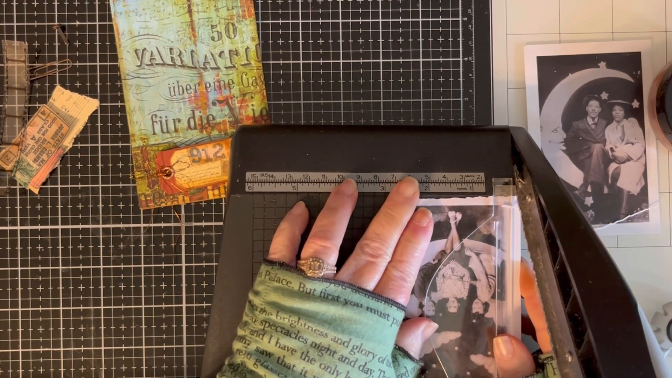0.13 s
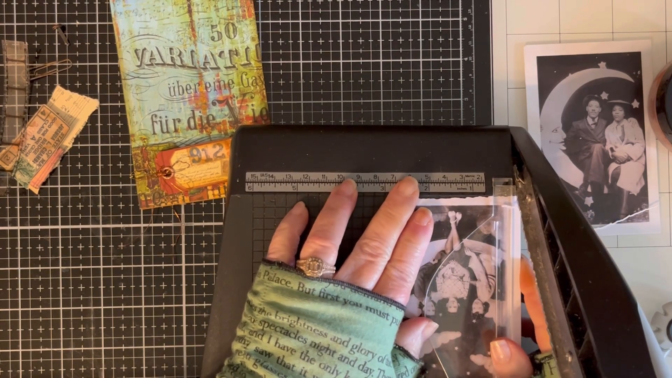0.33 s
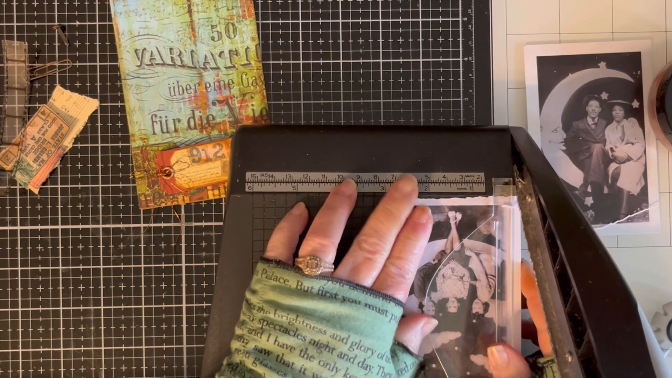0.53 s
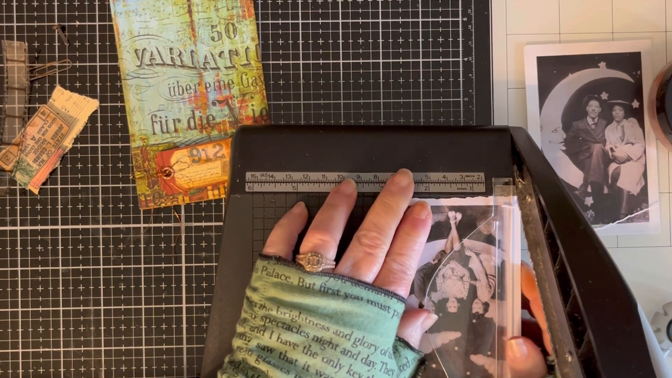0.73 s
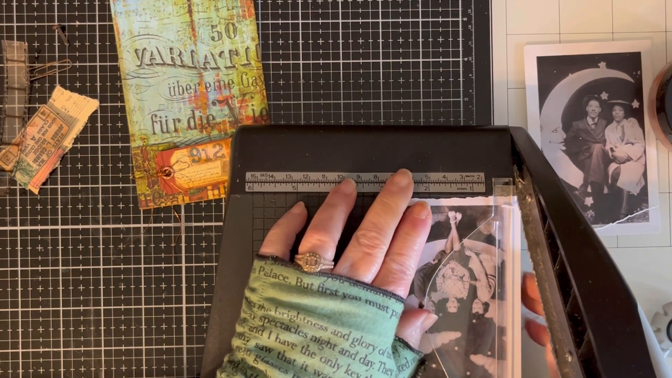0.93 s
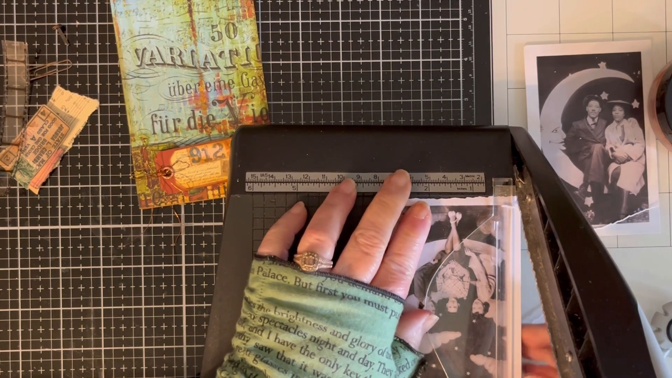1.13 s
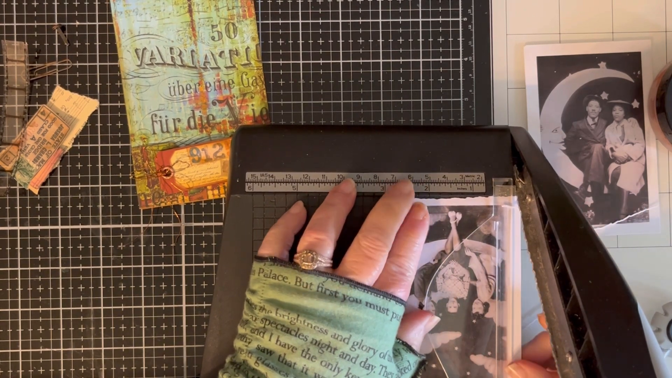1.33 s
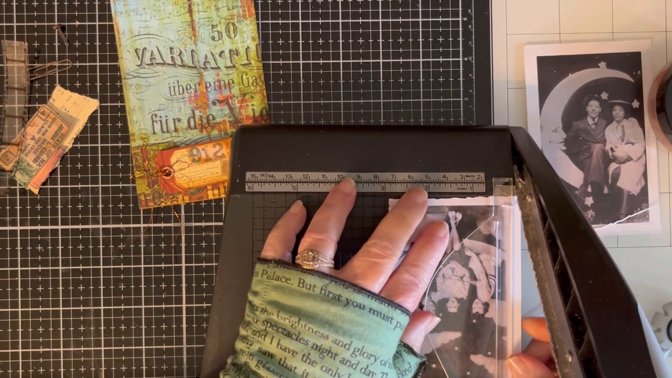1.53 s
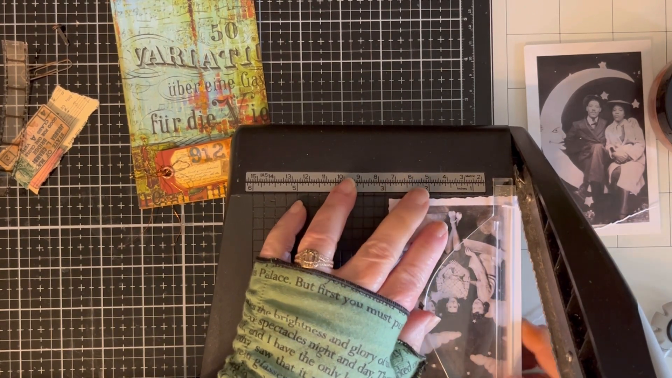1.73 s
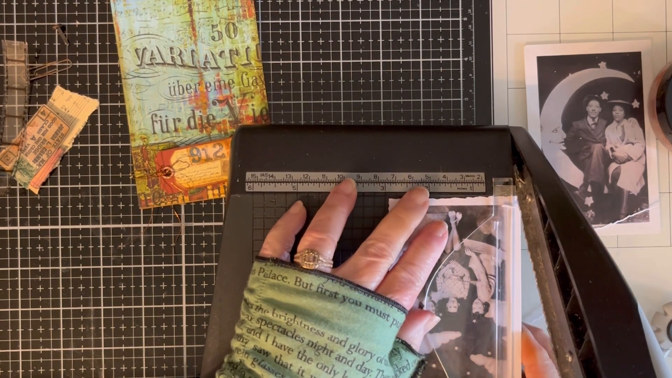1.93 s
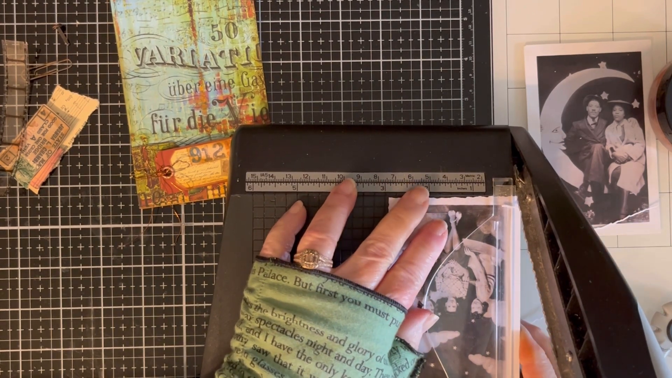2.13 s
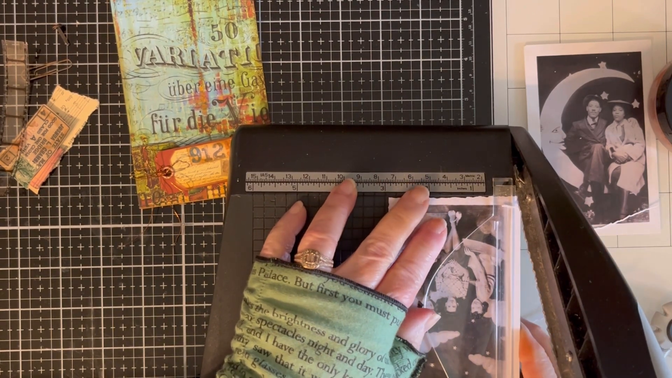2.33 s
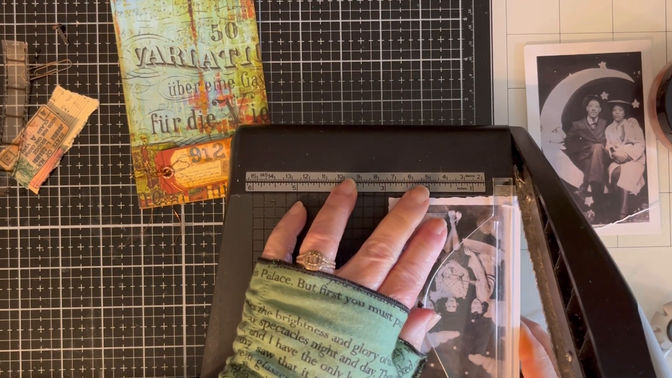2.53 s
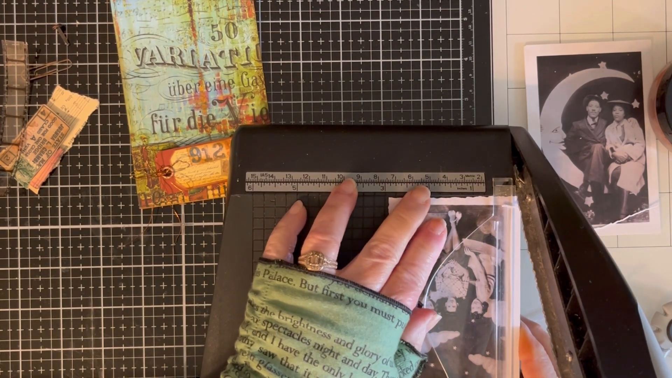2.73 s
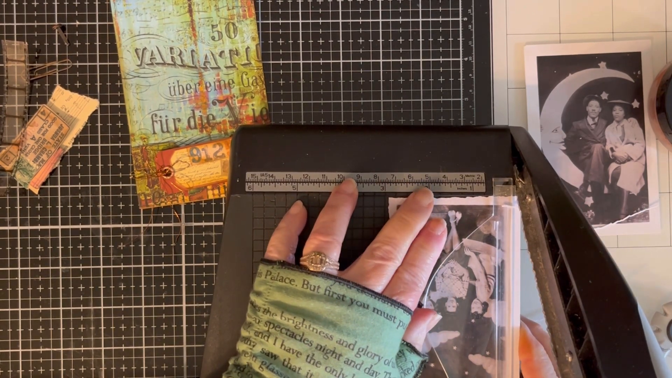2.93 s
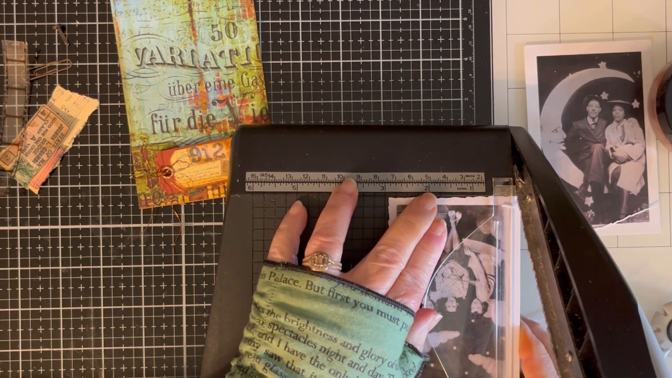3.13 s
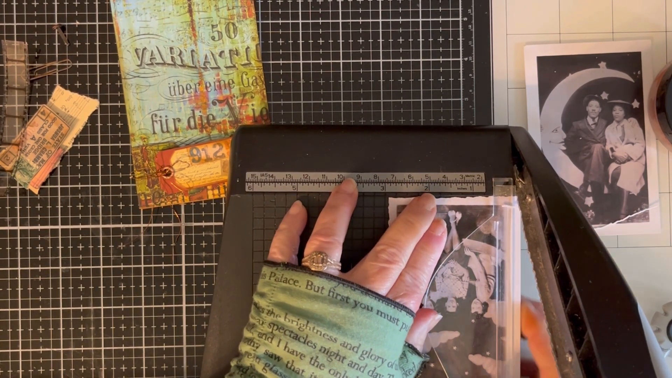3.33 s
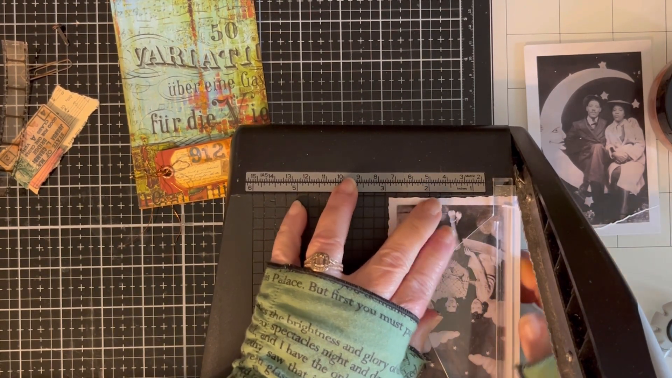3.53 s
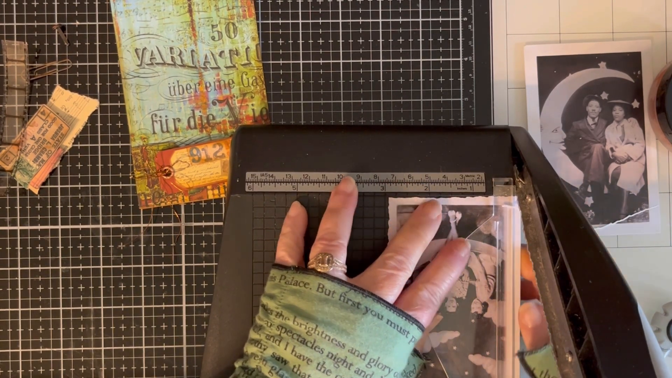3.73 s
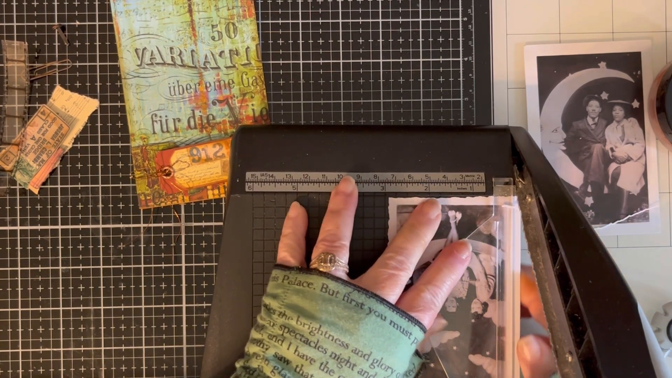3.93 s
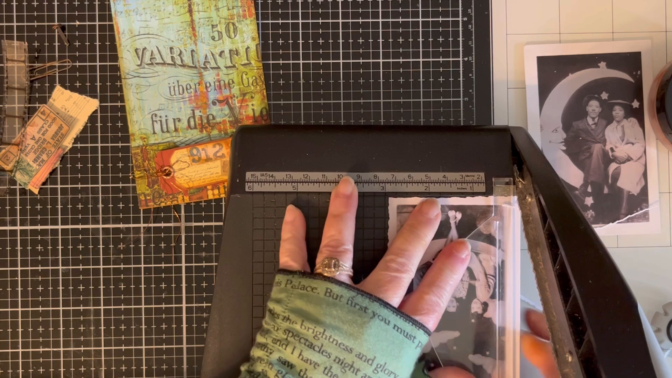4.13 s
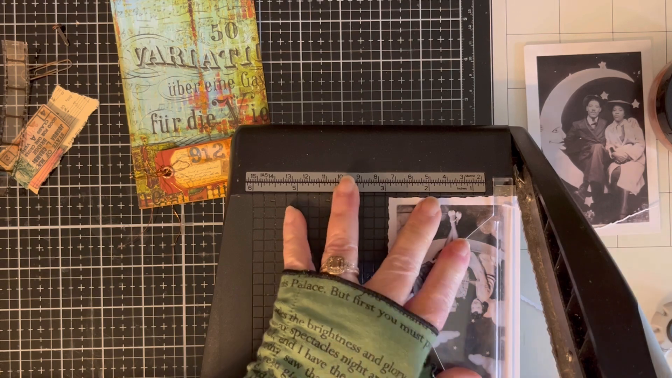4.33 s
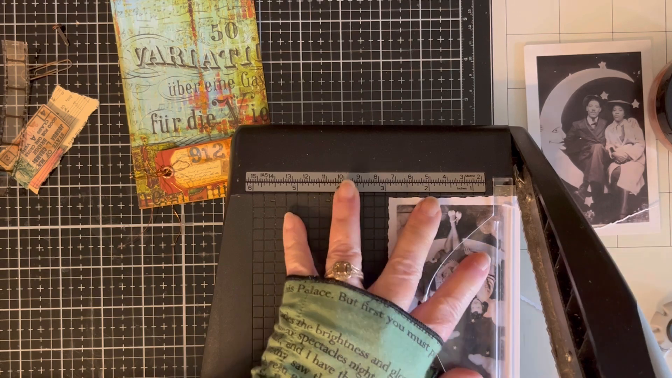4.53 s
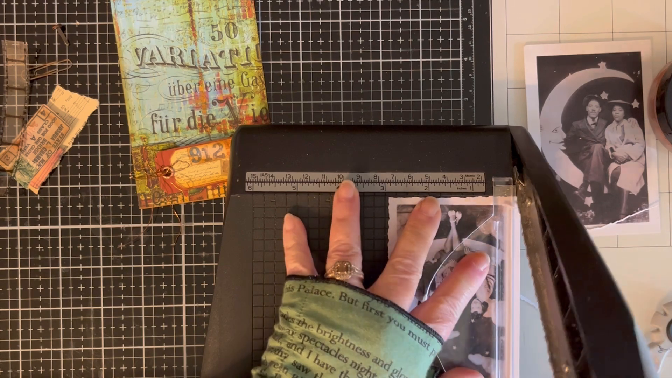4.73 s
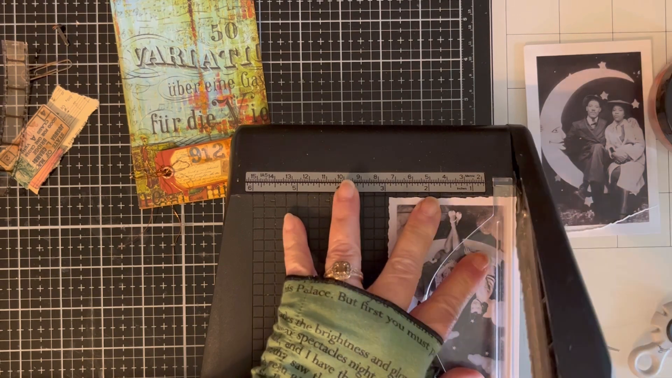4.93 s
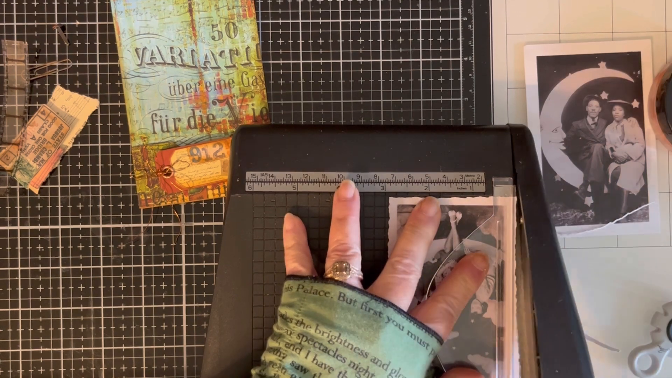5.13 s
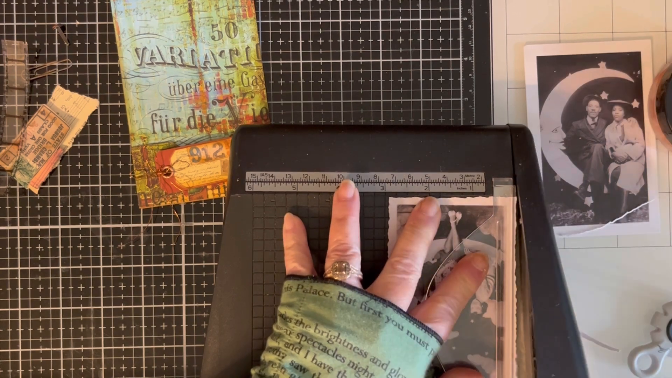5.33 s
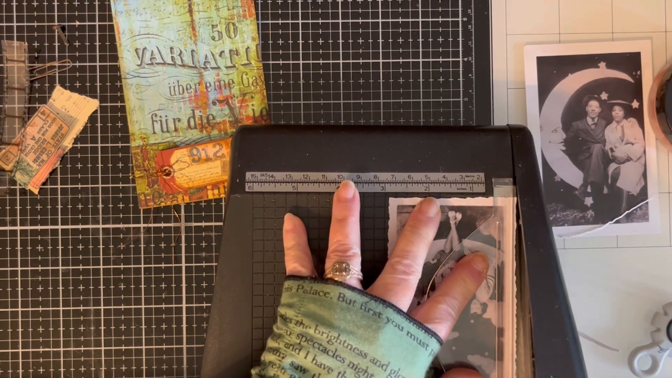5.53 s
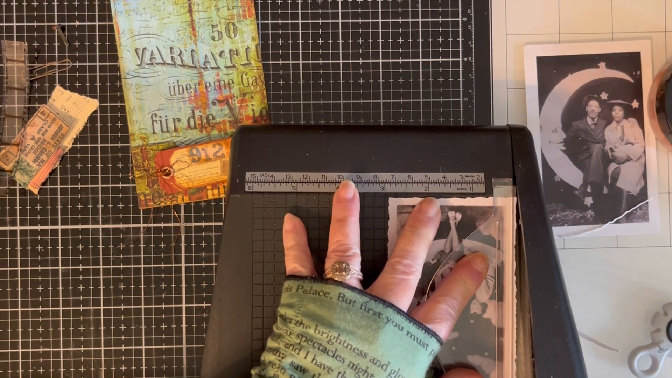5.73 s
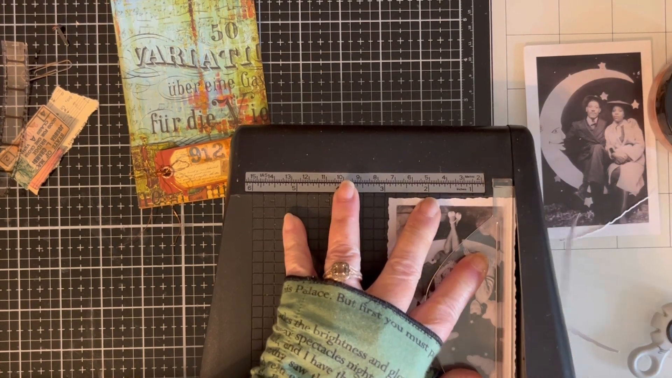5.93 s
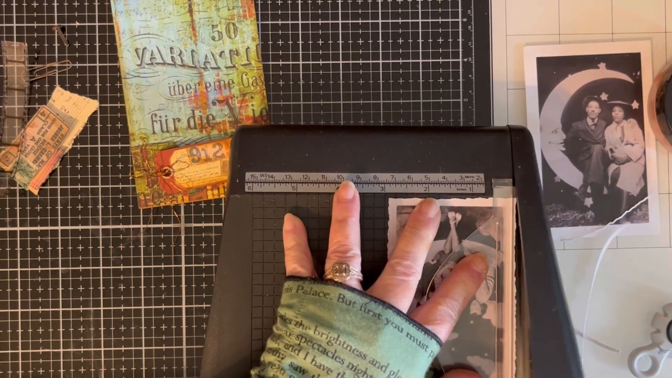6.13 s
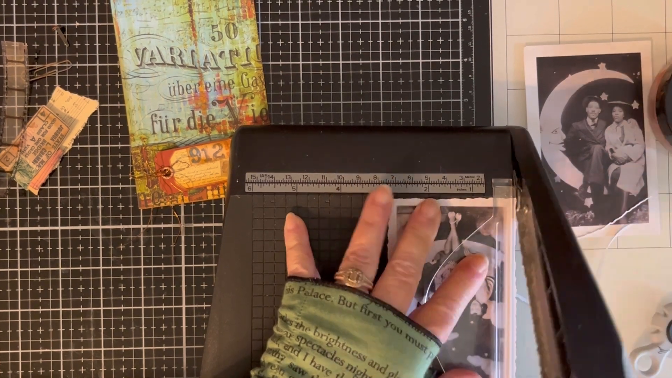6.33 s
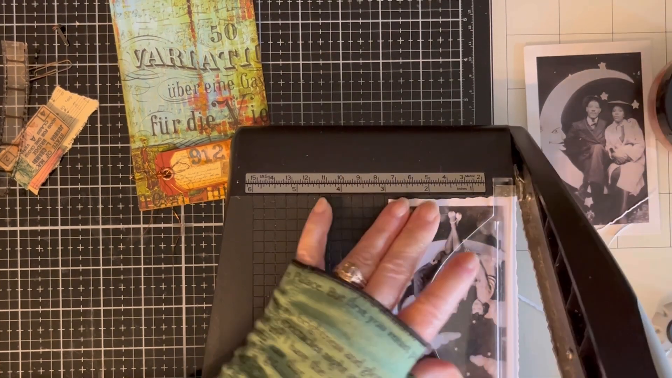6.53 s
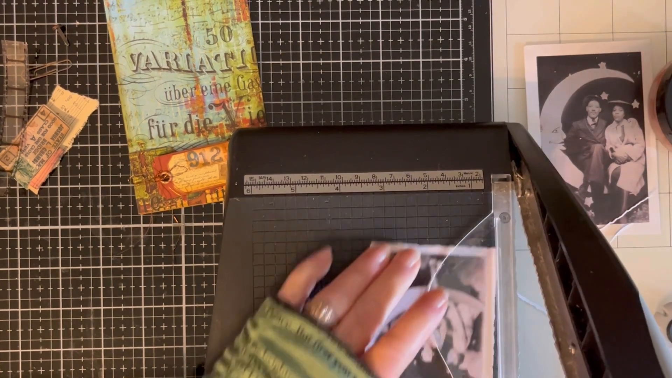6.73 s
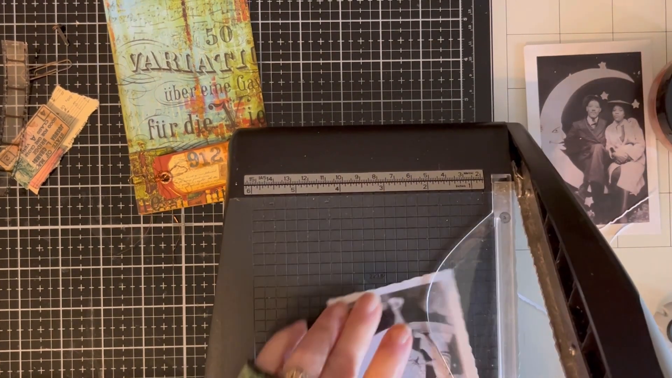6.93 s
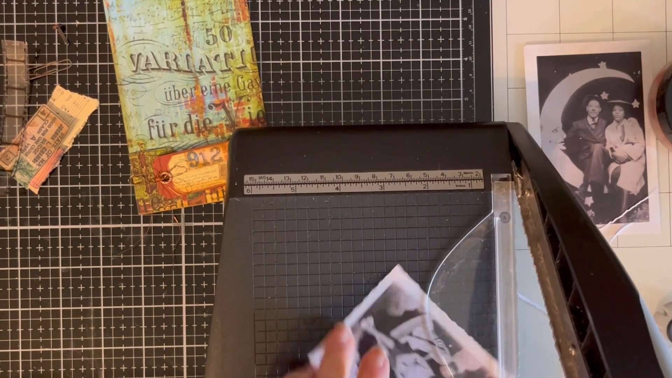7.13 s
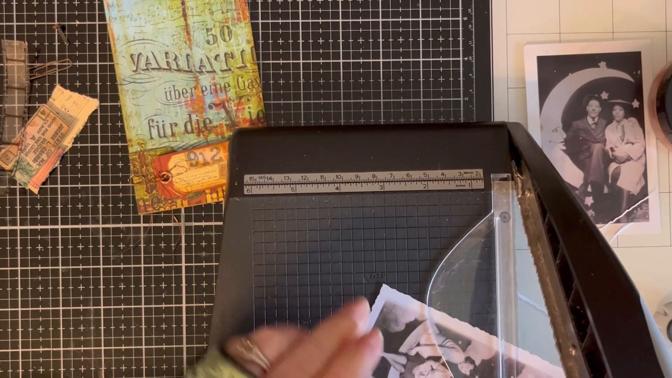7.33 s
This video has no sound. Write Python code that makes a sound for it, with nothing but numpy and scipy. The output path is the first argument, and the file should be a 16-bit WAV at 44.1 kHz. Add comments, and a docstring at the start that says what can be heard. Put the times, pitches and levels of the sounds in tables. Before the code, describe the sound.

Close up at a table in a quiet little room, scattered fingernail taps and soft rubs of card come from a photo being lined up on a paper trimmer. The steel blade rasps along the edge, catching with dry clacks and a low thud. A crackling scrape follows as the arm lifts, then the photo slides away and its edge snaps against the plastic bed.

```python
"""Fingers tap and a photo slides on the hollow plastic bed of a guillotine paper trimmer as it is lined up.
Then the blade arm comes down, rasps along the steel edge, judders through the card and lands on its stop,
shaking the table. It scrapes back up; the photo is drawn out and its edge snaps on the bed.
Heard from close by, at a table in a small, quiet room, through a two-port microphone."""
import sys
import numpy as np
from scipy import signal
from scipy.fft import rfft, irfft, next_fast_len
from scipy.io import wavfile

SR = 44100
rng = np.random.default_rng(int(sys.argv[2]) if len(sys.argv) > 2 else 0)


def materialize(psi):
    """Save the field psi as 16-bit PCM at rate SR to the path in sys.argv[1].

    A 1-D psi becomes a single channel; in a 2-D psi each row is a channel.
    """
    bounded = np.clip(np.atleast_2d(psi).T, -1, 1)
    quanta = np.round(bounded * 32767).astype(np.int16)
    wavfile.write(sys.argv[1], SR, quanta)


N = 325899
TIME = np.arange(N) / SR

# Pushes of the blade through the card and against its stop. Each row: start and length in seconds,
# swell in dB, fade t60 in seconds, then relative rasp, hiss and thud levels in dB.
CUTS = [(4.674, 0.37, 27.5, 0.1, -14, -29.5, -25), (5.081, 0.096, 1, 0.16, -16.5, -35, -29.5),
        (5.31, 0.004, -5, 0.11, -14, -36, -30), (5.334, 0.024, 22.5, 0.042, -19, -26, -24.5),
        (5.779, 0.0093, -2.5, 0.025, -16.5, -28, -28), (5.799, 0.025, -3, 0.044, -19, -29, -27.5),
        (5.843, 0.016, -4, 0.054, -23, -29.5, -30.5)]
# Resonances of the arm and of the table under it. Each row: centre and width in Hz, height in dB.
ARM_MODES = [(283.5, 27.5, 16.5), (365.6, 55, 15), (487.2, 27, 10), (666, 54, 6), (900, 79, 10),
             (1505, 220, 7), (1784, 100, 1), (2326, 110, 5), (2810, 90, 8), (3770, 200, -0.5),
             (4780, 1500, 4.5)]
THUD_MODES = [(46.5, 4.7, 7), (132.9, 26, 8), (185, 50, 12)]
# Colours of arm, steel edge and table from close by. Each row: frequency in Hz, level in dB.
CUT_RASP = [(150, -25), (250, -14.5), (330, -7.5), (600, -1), (950, -5), (1250, -11.5), (1700, -11.5),
            (2500, -15), (3300, -26.5), (6000, -64)]
STEEL_HISS = [(1500, -43.5), (2500, -5.5), (4500, 0), (5800, -3.5), (7000, -7), (8700, -8.5), (12000, -10),
              (14500, -15.5), (16000, -18)]
TABLE_THUD = [(20, -38), (30, -38), (44, 6.5), (65, 11), (95, 7.5), (135, 2), (180, -2), (240, -8.5),
              (400, -7.5), (1000, -86)]

def blade_down():
    """Steel shears along steel and card; the slips ring the arm and shake the table."""
    rasp, hiss, thud = arm_gains(CUTS)
    slips = friction(per_s=1500, spread_db=0.5, smooth=.5) * clumps(per_s=240, depth_db=3)
    arm = from_db(-5.5) * body(rasp * slips, CUT_RASP, ARM_MODES)
    fibres = friction(per_s=600, spread_db=6, smooth=.45) * clumps(per_s=150, depth_db=4)
    edge = from_db(-5.5) * body(hiss * (slips + fibres), STEEL_HISS, ARM_MODES)
    table = from_db(-4) * body(thud * rng.standard_normal(N), TABLE_THUD, THUD_MODES)
    return arm + edge + table

# The blade catching on the steel edge.
# Each row: time in seconds, relative knock and tick levels in dB, note of the clack in Hz.
CATCHES = [(4.675, -26, -58.5, 473), (4.916, -12.5, -41, 910), (4.991, 0, -28, 970), (5.021, -2, -37, 880),
           (5.082, -5.5, -35, 490), (5.143, -8, -34, 483), (5.314, -18.5, -36.5, 1630),
           (5.337, -2.5, -33.5, 824), (5.346, -1.5, -47, 660), (5.363, -9.5, -39, 380),
           (5.497, -51, -59, 814), (5.786, -8.5, -49.5, 516), (5.803, -3.5, -42, 694),
           (5.811, -8, -51.5, 624), (5.824, -6, -30, 1524), (5.85, -12, -32, 1170), (5.862, -3, -27, 567),
           (6.039, -43, -52.5, 900), (6.082, -22, -47, 1540), (6.1, -24.5, -37.5, 570),
           (6.13, -14.5, -38, 660), (6.194, -12, -34.5, 670), (6.226, -15.5, -41, 940),
           (6.281, -20.5, -44.5, 2520), (6.311, -22.5, -41, 724), (6.348, -20, -74, 900),
           (6.399, -17.5, -51.5, 882)]
PLAIN_TICK_DB = -32.5  # tick minus knock level; a sharper tick than this brightens the knock

def catches():
    """The blade sticks and lets go with a dry clack, a steel tick and a thud in the table."""
    times, knock_db, tick_db, notes_hz = np.transpose(CATCHES)
    tilts = .13 * (tick_db - knock_db - PLAIN_TICK_DB) + 1.17
    clacks = [clack(tilt, hz) for tilt, hz in zip(tilts, notes_hz)]
    knock = bending(place(times + 0.001166, knock_db, clacks), hz=690, width_hz=1200)
    tick = contacts(times, tick_db, chatter=6, chatter_s=0.0074, lag_s=0.00036)
    thud = contacts(times, knock_db - 18.5, chatter=0.19, chatter_s=.008, lag_s=0.0084)
    edge = from_db(27) * body(tick, STEEL_HISS, ARM_MODES)
    return from_db(13) * knock + edge + from_db(15) * body(thud, TABLE_THUD)

def clack(tilt, note_hz, width_hz=150, height_db=9):
    """One catch rings the arm at a note of its own; the harder it is, the brighter."""
    force = push(rng.standard_normal(4096), chatter=2.2, chatter_s=0.0065)
    return body(force, CUT_RASP, ARM_MODES + [(note_hz, width_hz, height_db)], tilt)

def stalls(stall_s=.005, dip_db=-6):
    """The slipping dips while the blade is caught, just before each clack."""
    gap_s = np.min([np.abs(TIME - time + stall_s / 2) for time, *_ in CATCHES], axis=0)
    return from_db(dip_db * np.exp(-(gap_s / stall_s) ** 2))

def arm_gains(rows):
    """Rasp and hiss follow the hand at once and stall at each catch; the table follows sluggishly."""
    rasp, hiss, _ = strokes(rows) * stalls()
    thud = strokes(rows, lag_s=0.014, linger=3.2)[-1]
    return rasp, hiss, thud

# The blade sings as the hand bears down.
# One row: start and length in seconds, swell in dB, fade t60 in seconds, level in dB.
SING = [(4.9, 0.086, 16, 0.56, -23)]

def blade_sing():
    """Shearing excites one bending mode of the steel blade."""
    level, = strokes(SING)
    note = glide(rng.standard_normal(N), np.full(N, 889), width_hz=33)
    return level * bandpass(note, [700, 1150])

# Ringing of table top and spring. Each row: frequency in Hz, level in dB, t60 in seconds.
TABLE_MODES = [(65, -46, 2.0), (93, -37, 1.3), (114, -43, 3.5), (194, -52, 1.2), (296, -52, .8),
               (351, -51, 1.1), (398, -55, .5), (786, -67, 3.3)]
# The frame's many weaker modes, dying away together.
# One row: start and length in seconds, swell in dB, fade t60 in seconds, level in dB.
SHUDDER = [(5.37, 0.0049, 18, 0.87, -48)]
# Their colour. Each row: frequency in Hz, level in dB.
SHUDDER_COLOUR = [(100, -27.5), (150, -14.5), (350, -0.5), (480, -15.5), (680, -11), (1000, -26),
                  (3000, -47.5)]

def blade_home(landing_s=5.368):
    """The arm lands on its stop and leaves table, spring and frame ringing."""
    landing = signal.unit_impulse(N, round(landing_s * SR))
    shudder, = strokes(SHUDDER)
    modes = sum(from_db(db) * ring(landing, hz, t60) for hz, db, t60 in TABLE_MODES)
    return modes + body(shudder * rng.standard_normal(N), SHUDDER_COLOUR)

# Pulls that raise the blade. Each row: start and length in seconds, swell in dB,
# fade t60 in seconds, then relative rasp, hiss and thud levels in dB.
LIFTS = [(6.042, 0.082, 25, 0.42, -23, -29, -38.5), (6.194, 0.01, 15, 0.32, -30, -35.5, -41),
         (6.28, 0.031, 15, 0.38, -40, -45.5, -43.5)]
# Colour of the arm on its way up. Each row: frequency in Hz, level in dB.
LIFT_RASP = [(150, -52), (260, -11), (480, -1.5), (620, 7), (800, 1.5), (1000, 9), (1250, -1.5), (1800, 1),
             (2600, -5.5), (3300, -8.5), (6000, -30.5)]

def blade_up():
    """The rising blade scrapes in short crackling bursts and sets its edge ringing."""
    rasp, hiss, thud = arm_gains(LIFTS)
    bursts = clumps(per_s=320, depth_db=4)
    slips = friction(per_s=2200, spread_db=1, smooth=.4) * np.sqrt(bursts)
    arm = from_db(-8) * body(rasp * slips, LIFT_RASP, ARM_MODES)
    ringing = from_db(-3.5) * edge_ring(rasp * slips)
    crackle = friction(per_s=500, spread_db=6, smooth=.35) * bursts
    edge = from_db(-11.5) * body(hiss * (slips + crackle), STEEL_HISS, ARM_MODES)
    table = from_db(-2) * body(thud * rng.standard_normal(N), TABLE_THUD)
    return arm + ringing + edge + table

# The edge rings higher as the contact runs back, then settles. Each row: time in seconds, pitch in Hz.
EDGE_PITCH = [(6.045, 500), (6.13, 634), (6.172, 805), (6.195, 676)]

def edge_ring(force, overtone_ratio=2.85, width_hz=75):
    """Two well damped bending modes of the rising blade glide together."""
    pitch = np.interp(TIME, *np.transpose(EDGE_PITCH))
    overtone = from_db(-11) * glide(force, overtone_ratio * pitch, width_hz)
    return bandpass(glide(force, pitch, width_hz) + overtone, [450, 3200])

# Fingers and card striking the bed, close to the microphone.
# Each row: time in seconds, relative knock, tick and thud levels in dB, note of the struck spot in Hz.
TAPS = [(0.331, -48.5, -83, -78, 810), (0.483, -39, -81, -75, 770), (0.519, -19.5, -61.5, -40, 580),
        (0.667, -43.5, -75, -48, 734), (0.804, -37, -83, -54, 870), (1.046, -63, -83, -72, 970),
        (1.167, -33, -59, -53, 870), (1.206, -24, -62.5, -42.5, 686), (1.337, -52.5, -78, -53, 876),
        (1.537, -51, -77, -72, 900), (1.987, -49.5, -97, -69, 800), (2.138, -50.5, -105, -72, 780),
        (2.282, -27, -64.5, -48, 613), (2.333, -33.5, -80.5, -43.5, 615), (2.464, -47.5, -90, -53, 686),
        (2.637, -36.5, -84.5, -50.5, 670), (2.715, -49.5, -84.5, -73, 920), (2.788, -36, -91, -51.5, 680),
        (2.986, -36, -83, -58, 665), (3.013, -36, -86, -49, 660), (3.118, -45, -75.5, -60, 657),
        (3.184, -43, -95, -71, 950), (3.485, -30, -71, -78, 750), (3.652, -42, -85, -66, 810),
        (3.822, -31.5, -75, -47, 640), (4.013, -27.5, -52, -52, 990), (4.036, -36.5, -63, -58, 1000),
        (4.135, -38, -66, -76, 1690), (4.411, -49, -76, -49.5, 775), (4.546, -31.5, -55.5, -47.5, 820),
        (6.926, -29, -52, -45, 444)]
# Resonances of the hollow plastic bed. Each row: centre and width in Hz, height in dB.
BED_MODES = [(295, 130, 9), (640, 220, 4), (961, 110, 6), (1440, 180, 8), (1630, 210, 4.5), (2160, 140, 5),
             (4400, 800, 4)]
# Colour of a nail or card tick. Each row: frequency in Hz, level in dB.
TICK_COLOUR = [(1500, -14.5), (2800, -2.5), (4500, 2), (7000, -4.5), (10000, -7.5), (12500, -9),
               (16000, -26)]

def taps():
    """Nails and card edges knock on the hollow bed, which thuds on the table."""
    times, knock_db, tick_db, thud_db, notes_hz = np.transpose(TAPS)
    tilts = 0.145 * (tick_db - knock_db - PLAIN_TICK_DB)
    knocks = [bed_knock(tilt, hz) for tilt, hz in zip(tilts, notes_hz)]
    knock = bending(place(times + 0.001245, knock_db, knocks), hz=607, width_hz=380)
    tick = contacts(times, tick_db, chatter=1.64, chatter_s=0.0048, lag_s=0.00026)
    thud = contacts(times, thud_db, chatter=1, chatter_s=0.062, lag_s=0.0044)
    table = from_db(25.5) * body(bending(thud, hz=63, width_hz=160), TABLE_THUD)
    return from_db(18) * knock + from_db(35.5) * body(tick, TICK_COLOUR, BED_MODES) + table

# Colour of a knock at the bed's usual note. Each row: frequency in Hz, level in dB.
KNOCK_COLOUR = [(120, -59), (240, -8), (350, -5.5), (600, 6), (900, 1), (1200, -2.5), (1700, -3),
                (2400, -7), (3300, -15.5), (6000, -56)]
BED_NOTE_HZ, SPOT_SPREAD_OCTAVES, SPOT_SPREAD_DB = 640, .04, 2

def bed_knock(tilt, note_hz, width_hz=300, height_db=7):
    """Each spot has its own note and mix of modes; a nail sounds brighter than a fingertip."""
    scatter = rng.standard_normal((len(BED_MODES), 2))
    modes = [(hz * 2 ** (SPOT_SPREAD_OCTAVES * shift), width, db + SPOT_SPREAD_DB * lift)
             for (hz, width, db), (shift, lift) in zip(BED_MODES, scatter)]
    colour = np.multiply(KNOCK_COLOUR, [(note_hz / BED_NOTE_HZ) ** .7, 1])  # stiffer spots sit higher
    force = push(rng.standard_normal(4096), chatter=1.27, chatter_s=0.01)
    return body(force, colour, modes + [(note_hz, width_hz, height_db)], tilt)

# The photo's edge flicking off the guard. Each row: time in seconds, relative level in dB.
SNAPS = [(7.161, -29.5), (7.168, -18.5), (7.176, -34)]
# Resonances of the flicked card. Each row: centre and width in Hz, height in dB.
SNAP_MODES = [(395, 44, 17.5), (615, 190, 16), (720, 47, 10), (1500, 540, 28.5), (2086, 300, 20),
              (3440, 120, 15), (4700, 1060, 14)]
# Its broad colour. Each row: frequency in Hz, level in dB.
SNAP_COLOUR = [(200, -18), (380, -7), (650, 2), (1150, -27.5), (2800, -14.5), (10000, -25), (15000, -38)]

def snap():
    """The bent photo springs free and slaps the bed three times: a soft touch, a hard slap, a faint one."""
    times, levels_db = np.transpose(SNAPS)
    slaps = contacts(times, levels_db, chatter=2.3, chatter_s=0.0086, lag_s=0.00056)
    return from_db(24) * body(bending(slaps, hz=620, width_hz=1600), SNAP_COLOUR, SNAP_MODES)

# A fingertip skidding on the glossy photo. One row: start and length in seconds, swell in dB,
# fade t60 in seconds, then relative rub and hiss levels in dB.
SKID = [(1.683, 0.053, 17.5, 0.18, -34, -52.5)]
# Resonances of the photo under the finger. Each row: centre and width in Hz, height in dB.
SKID_MODES = [(830, 130, 10), (1480, 300, 15), (3330, 300, 11)]
# Colour of the rub. Each row: frequency in Hz, level in dB.
SKID_RUB = [(250, -27.5), (450, -13.5), (620, 0), (950, -4.5), (1300, -20.5), (2000, -14), (3000, -34),
            (6000, -86)]

def skid():
    """The fingertip sticks and slips rapidly on the gloss."""
    rub, hiss = strokes(SKID)
    slips = friction(per_s=1200, spread_db=1.5, smooth=0.79)
    rubbing = body(rub * slips, SKID_RUB, SKID_MODES)
    hissing = body(hiss * slips, TICK_COLOUR, SKID_MODES, tilt=-4)
    return from_db(0.5) * (rubbing + hissing)

# Moves of the card over the bed. Each row: start and length in seconds, relative rub and hiss in dB.
SLIDES = [(.44, 0.069, -54, -88), (.51, 0.095, -53.5, -71), (.79, 0.058, -51.5, -77.5),
          (1.11, 0.22, -55, -71), (1.42, 0.13, -60, -96), (1.525, 0.095, -56, -70),
          (3.24, 0.39, -65, -69.5), (3.49, 0.25, -56.5, -86), (3.725, 0.12, -61, -86),
          (3.85, 0.24, -49, -68.5), (4.03, 0.17, -58, -73), (4.205, 0.21, -65, -87),
          (4.4, 0.26, -57.5, -86), (4.52, 0.18, -58.5, -74.5), (6.4, 0.81, -52.5, -65),
          (6.54, 0.49, -49, -57.5), (7.02, 0.24, -47.5, -70.5), (7.135, 0.036, -52, -64)]
# Colours of the sliding card from close by. Each row: frequency in Hz, level in dB.
CARD_RUB = [(150, -9), (300, -10.5), (450, 1), (700, 10), (1000, 0.5), (1250, -10), (1700, -4), (2500, -14),
            (3300, -17.5), (6000, -63.5)]
CARD_HISS = [(1500, -24), (2500, 4), (3100, -1), (4500, 7), (5800, 1), (7000, -2.5), (12000, -0.5),
             (16000, -5)]
# The photo's edge rings higher as it is drawn out faster. Each row: time in seconds, pitch in Hz.
PHOTO_PITCH = [(6.58, 890), (6.72, 988), (6.85, 1060), (7.0, 937)]

def slides():
    """Card fibres drag over the bed: a fine hiss, a duller rub where fingers press, a ringing edge."""
    rub, hiss = moves(SLIDES)
    drag = friction(per_s=350, spread_db=5, smooth=1.8) * clumps(per_s=60, depth_db=3)
    drawing_out = TIME > PHOTO_PITCH[0][0]
    pitch = np.interp(TIME, *np.transpose(PHOTO_PITCH))
    edge = bandpass(glide(rub * drag * drawing_out, pitch, width_hz=40), [600, 2000])
    rubbing = from_db(1) * body(rub * drag, CARD_RUB, BED_MODES)
    return rubbing + from_db(-5) * edge + from_db(5) * body(hiss * drag, CARD_HISS)

# The photo bowing as it clears the guard.
# One row: start and length in seconds, swell in dB, fade t60 in seconds, level in dB.
BOW = [(6.926, 0.0097, -21, 0.9, -45)]

def bow(start_hz=275, octaves_per_s=8.8, fall_s=.07):
    """The bowed photo gives one soft, sinking wobble."""
    level, = strokes(BOW)
    pitch = start_hz * 2 ** (-octaves_per_s * np.clip(TIME - BOW[0][0], 0, fall_s))
    wobble = glide(rng.standard_normal(N), pitch, width_hz=76)
    return level * bandpass(wobble, [150, 500])

def strokes(rows, lag_s=0, linger=1, bite_s=0.0069):
    """One gain curve per level column: a push takes hold, swells (or sags, if negative), then fades."""
    total = 0
    for start, length, swell_db, t60, *levels_db in rows:
        age = np.maximum(TIME - start - lag_s, 0)
        bite = np.minimum(age / bite_s, 1)
        rise_db = swell_db * np.minimum(age / length - 1, 0)
        fade_db = -60 * np.clip((age - length) / (t60 * linger), 0, 3)
        total = total + np.outer(from_db(levels_db), bite * from_db(rise_db + fade_db))
    return total

def moves(rows, skew=0.9, speed_power=0.85):
    """One gain curve per level column: loudness follows the card as it speeds up and comes to rest."""
    power = np.zeros((2, N))
    for start, length, *levels_db in rows:
        span = slice(*np.searchsorted(TIME, [start, start + length]))
        progress = (TIME[span] - start) / length
        speed = np.abs(np.sin(np.pi * progress ** skew))  # a skew under 1 peaks early
        power[:, span] += np.outer(from_db(levels_db), speed ** speed_power) ** 2
    return np.sqrt(power)

def friction(per_s, spread_db, smooth):
    """The force of tiny slips of uneven size over a smooth drag; unit power."""
    sizes = from_db(spread_db * np.minimum(rng.exponential(1, N), np.pi)) * rng.choice([-1, 1], N)
    slips = sizes * (rng.random(N) < per_s / SR)
    force = slips / slips.std() + smooth * rng.standard_normal(N)
    return force / force.std()

def clumps(per_s, depth_db):
    """Fibres give way in bunches: an uneven gain of unit power."""
    knots = np.cumsum(rng.exponential(1 / per_s, 4096))
    gain = from_db(depth_db * np.interp(TIME, knots, rng.uniform(-0.36, 1, len(knots))))
    return gain / np.sqrt(np.mean(gain ** 2))

def push(noise, chatter, chatter_s):
    """One sharp push followed by dying chatter; unit energy."""
    pulse = noise * np.exp(-np.arange(len(noise)) / SR / chatter_s)
    pulse *= chatter / np.linalg.norm(pulse)
    pulse[0] = 1
    return pulse / np.linalg.norm(pulse)

def contacts(times, levels_db, chatter, chatter_s, lag_s):
    """The force of a row of contacts, each with its own chatter."""
    pushes = [push(noise, chatter, chatter_s) for noise in rng.standard_normal((len(times), 2048))]
    return place(times + lag_s, levels_db, pushes)

def place(times, levels_db, sounds):
    """Lay short sounds on the time line."""
    track = np.zeros(N + SR)
    for time, db, sound in zip(times, levels_db, sounds):
        start = round(time * SR)
        track[start:start + len(sound)] += from_db(db) * sound
    return track[:N]

def body(force, colour, modes=(), tilt=0, size=8192):
    """An object's answer to a force: a colour, tilted in dB per octave, with resonant peaks on it."""
    hz = np.fft.rfftfreq(size, 1 / SR)
    db = at_hz(colour, hz) + tilt * np.log2(hz + 1)
    db += sum(height / (1 + (2 * (hz - centre) / width) ** 2) for centre, width, height in modes)
    cepstrum = irfft(np.log(from_db(db)))
    response = irfft(np.exp(rfft(2 * cepstrum * (np.arange(size) < size // 2))))  # minimum phase
    return signal.oaconvolve(force, response / np.linalg.norm(response))[:len(force)]

def bending(force, hz, width_hz):
    """Slow bending waves: a plate's notes around hz arrive a little after its tick."""
    radius = np.exp(-np.pi * width_hz / SR)
    poles = [1, -2 * radius * np.cos(2 * np.pi * hz / SR), radius ** 2]
    return signal.lfilter(poles[::-1], poles, force)

def ring(force, hz, t60):
    """One freely ringing mode."""
    radius, angle = from_db(-60 / (t60 * SR)), 2 * np.pi * hz / SR
    poles = [1, -2 * radius * np.cos(angle), radius ** 2]
    return signal.lfilter([0, np.sin(angle)], poles, force + 1e-18)

def glide(force, hz, width_hz):
    """A resonance whose centre follows a curve; it keeps the power of a white force."""
    turn = np.exp(2j * np.pi * np.cumsum(hz) / SR)
    radius = np.exp(-np.pi * width_hz / SR)
    envelope = signal.lfilter([1], [1, -radius], force / turn + 1e-18)
    return np.sqrt(2 * (1 - radius ** 2)) * np.real(turn * envelope)

def bandpass(sound, band_hz, order=2):
    """Keep the band between two frequencies."""
    return signal.sosfilt(signal.butter(order, band_hz, "band", fs=SR, output="sos"), sound)

def at_hz(points, hz):
    """Read a spectrum on a log-frequency axis."""
    knots, values = np.transpose(points)
    return np.interp(np.log(hz + 1), np.log(knots), values)

def from_db(db):
    """Decibels as an amplitude factor."""
    return 10 ** (np.asarray(db) / 20)

def reflections(sound, wet_db, apart, band_hz, t60, build_s, size=24000):
    """Add a dying cloud of echoes; apart (0-1) sets how unlike they are at the two ports."""
    age = np.arange(size) / SR
    shared, own = rng.standard_normal((2, size))
    envelope = from_db(-60 * age / t60) * (1 - np.exp(-age / build_s))
    tails = bandpass((shared + apart * own * [[1], [-1]]) * envelope, band_hz, order=1)
    echoes = signal.oaconvolve(np.atleast_2d(sound), tails / np.linalg.norm(tails[0]), axes=1)
    return sound + from_db(wet_db) * echoes[:, :N]

# Colour of the quiet room at the microphone. Each row: frequency in Hz, level in dB.
ROOM_TONE = [(20, -42), (40, -12), (62, 0), (90, -3), (130, -15), (200, -28), (400, -31.5), (800, -31.5),
             (1500, -39), (3000, -49), (16000, -63)]

def room_tone():
    """A faint, steady rumble fills the room."""
    return from_db(-61) * body(rng.standard_normal(N), ROOM_TONE)

def scene():
    """Trimmer and photo up close, with quick echoes off the table and a short room tail behind them."""
    blade = blade_down() + blade_sing() + blade_home() + blade_up() + catches()
    photo = taps() + slides() + skid() + bow() + snap()
    on_table = reflections(blade + photo, wet_db=-8.5, apart=0.06, band_hz=[2000, 14000],
                           t60=0.014, build_s=0.012)
    in_room = reflections(on_table, wet_db=-18, apart=.7, band_hz=[250, 6500], t60=0.26, build_s=0.00048)
    return in_room + room_tone()

# Phase between the microphone's ports. Each row: frequency in Hz, lead of the left port in radians.
PORT_PHASE = [(20, 0), (300, -.5), (700, -.8), (1600, -.25), (2100, .5), (2700, 2.2), (3400, 1.05),
              (4100, .7), (5700, 2.9), (8400, 6.0), (9700, 6.4), (11800, 9.3), (12900, 9.5), (14700, 12.3),
              (16000, 12.7)]
# Balance between them. Each row: frequency in Hz, left minus right in dB.
PORT_BALANCE = [(60, .5), (180, 1), (350, 2.2), (800, 2.2), (1200, 0)]

def record(dry):
    """The close microphone's two ports differ in phase and level; the top is cut at 16 kHz."""
    size = next_fast_len(N + SR // 10)
    hz = np.fft.rfftfreq(size, 1 / SR)
    lead = np.interp(hz, *np.transpose(PORT_PHASE))
    half = np.array([[.5], [-.5]])  # each port takes half, in opposite directions
    response = from_db(half * at_hz(PORT_BALANCE, hz)) * np.exp(1j * half * lead)
    ports = irfft(rfft(dry, size) * response, size)[:, :N]
    return signal.sosfilt(signal.ellip(10, .2, 80, 16000, fs=SR, output="sos"), ports)

dry = scene()
out = record(dry)
materialize(out)
```